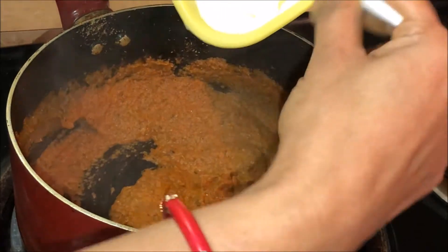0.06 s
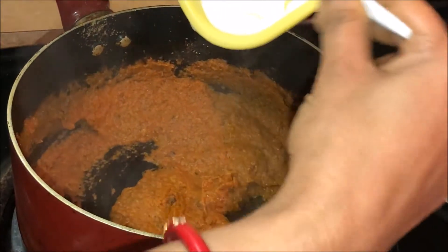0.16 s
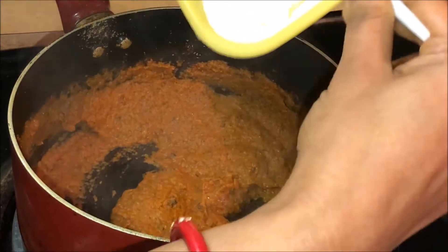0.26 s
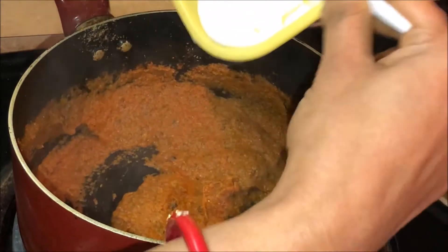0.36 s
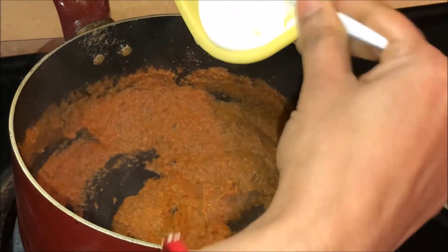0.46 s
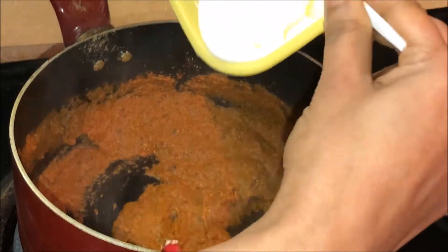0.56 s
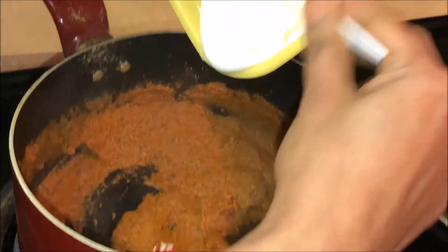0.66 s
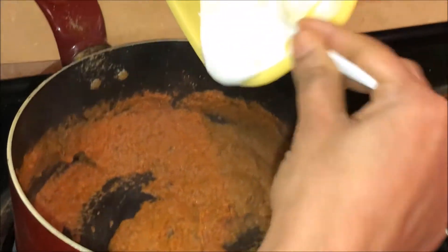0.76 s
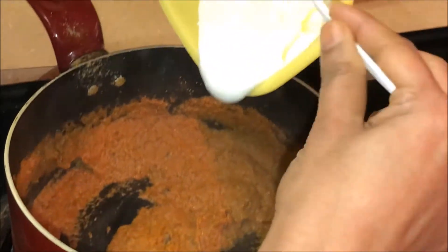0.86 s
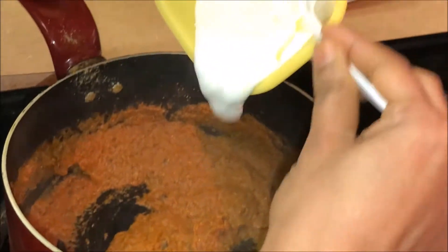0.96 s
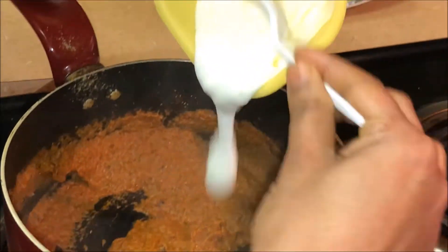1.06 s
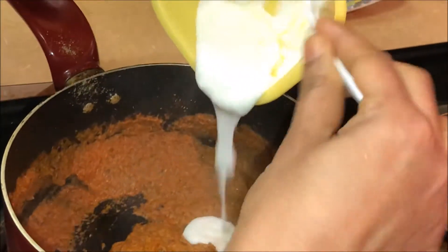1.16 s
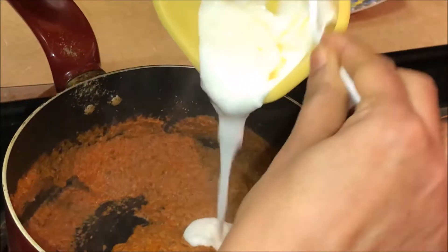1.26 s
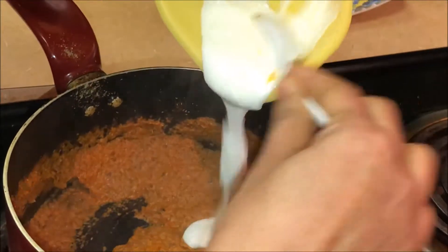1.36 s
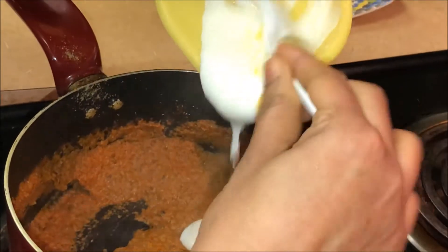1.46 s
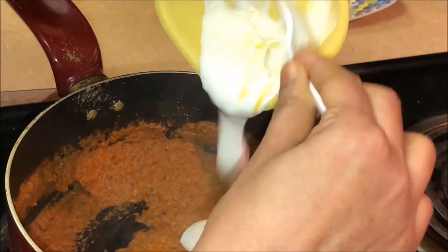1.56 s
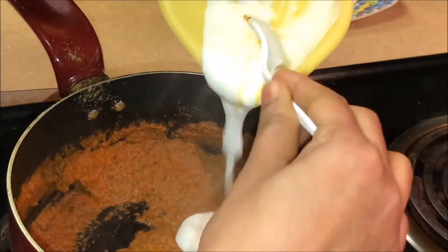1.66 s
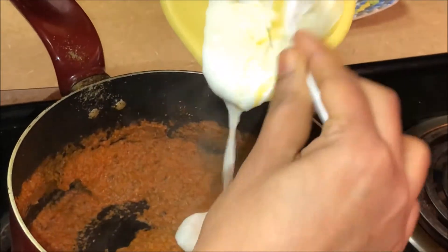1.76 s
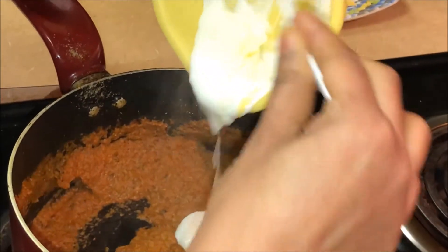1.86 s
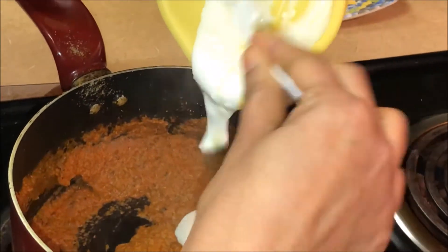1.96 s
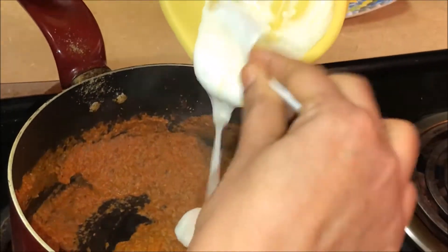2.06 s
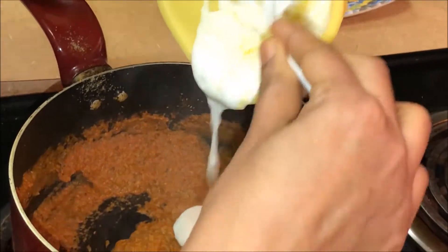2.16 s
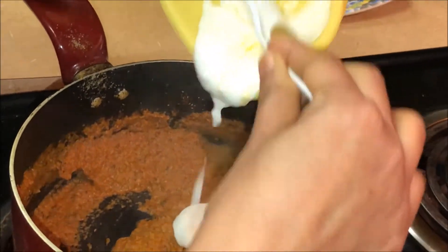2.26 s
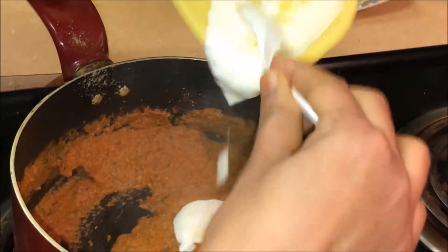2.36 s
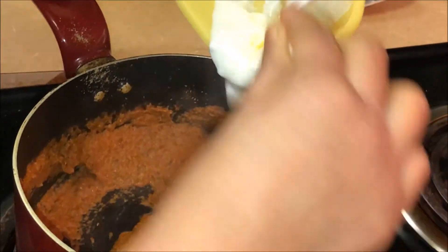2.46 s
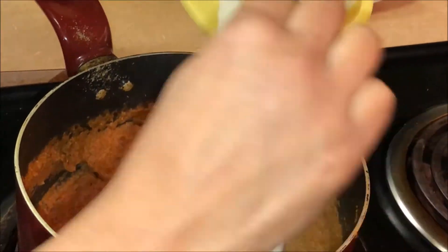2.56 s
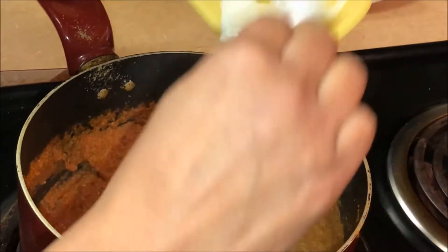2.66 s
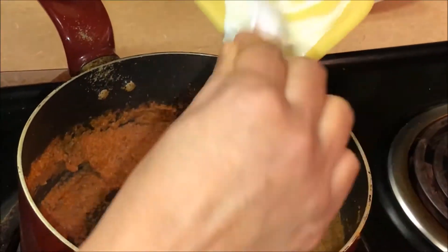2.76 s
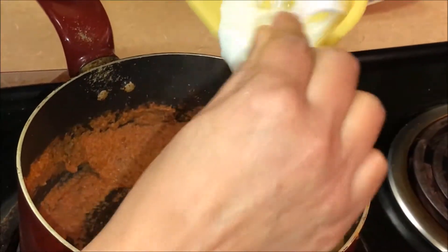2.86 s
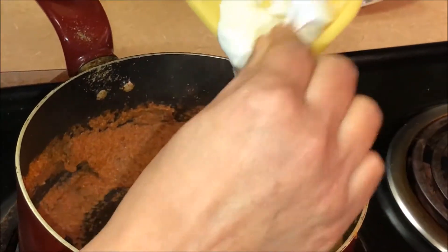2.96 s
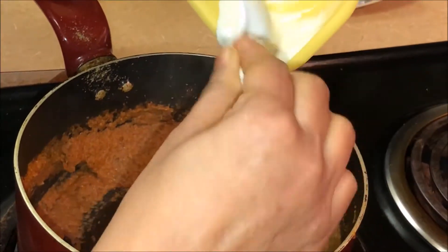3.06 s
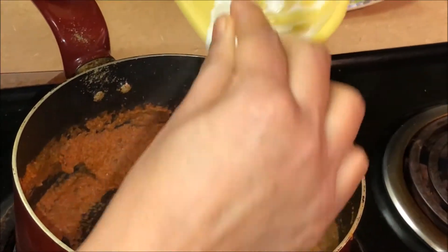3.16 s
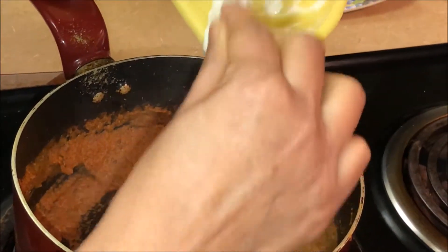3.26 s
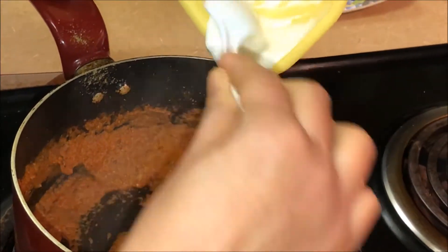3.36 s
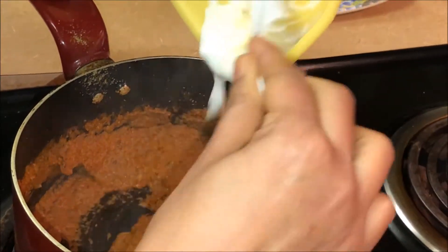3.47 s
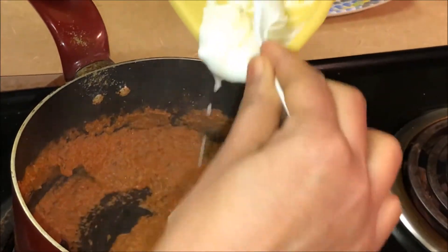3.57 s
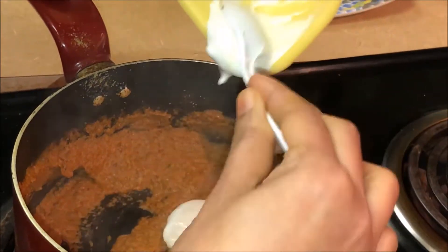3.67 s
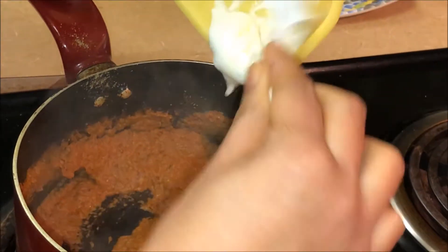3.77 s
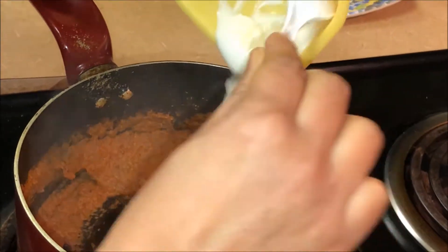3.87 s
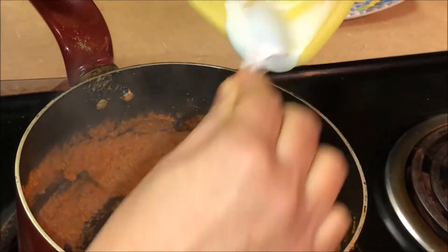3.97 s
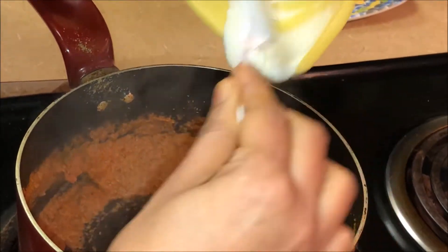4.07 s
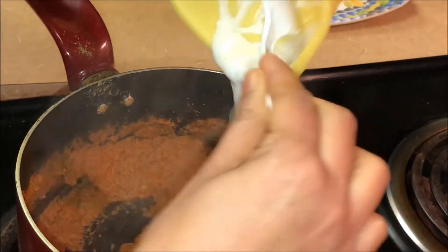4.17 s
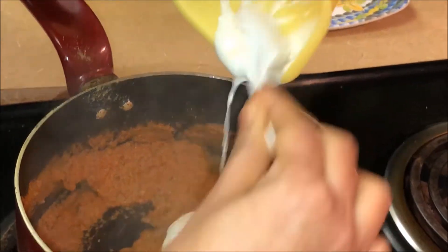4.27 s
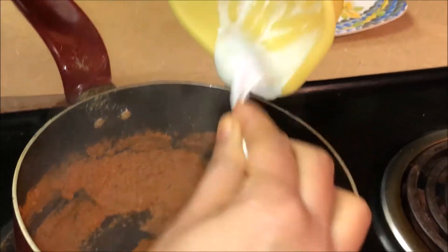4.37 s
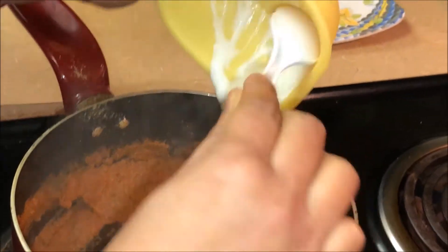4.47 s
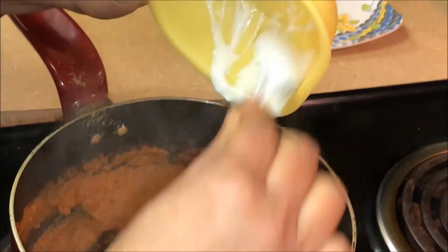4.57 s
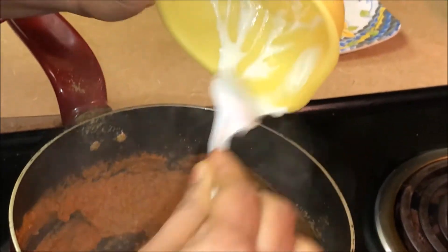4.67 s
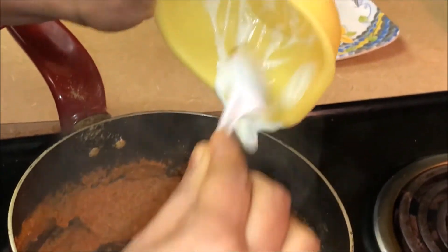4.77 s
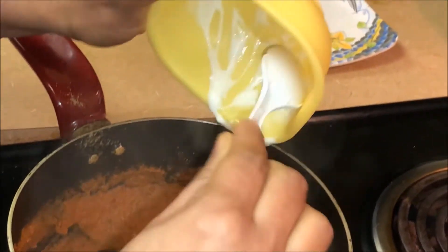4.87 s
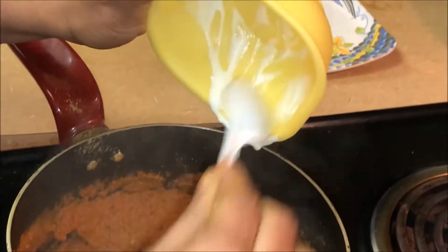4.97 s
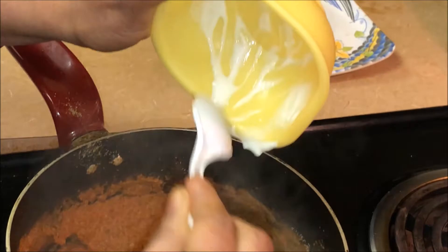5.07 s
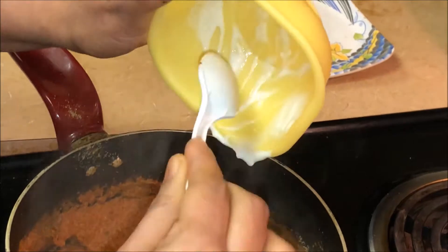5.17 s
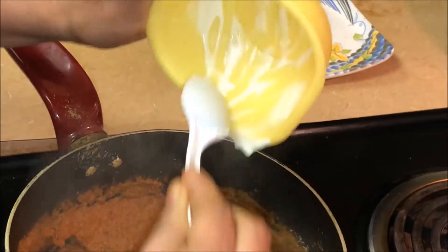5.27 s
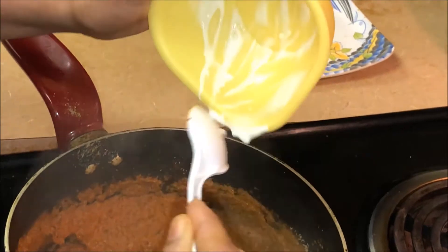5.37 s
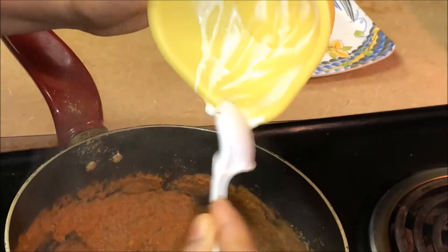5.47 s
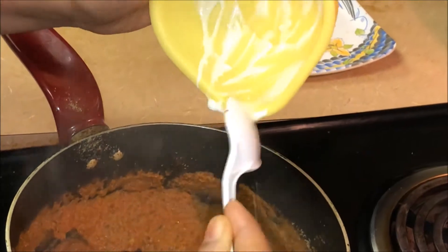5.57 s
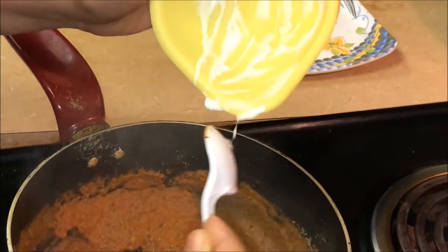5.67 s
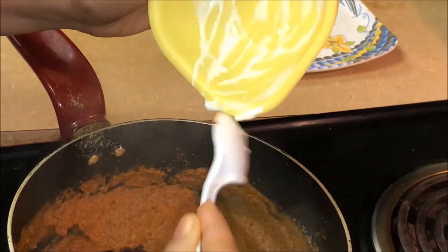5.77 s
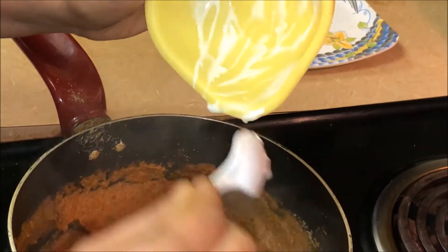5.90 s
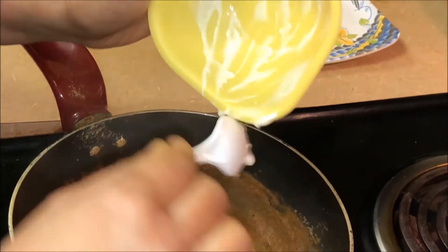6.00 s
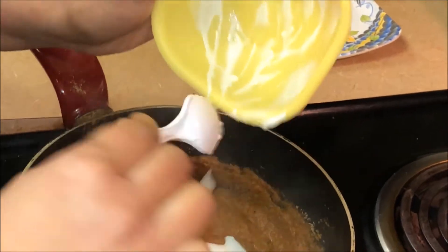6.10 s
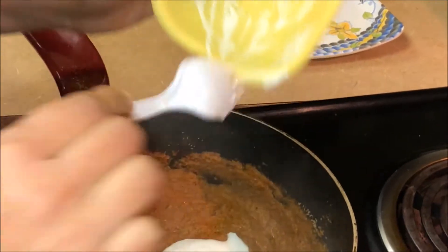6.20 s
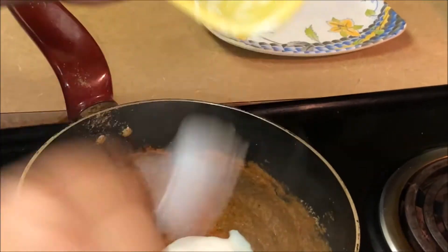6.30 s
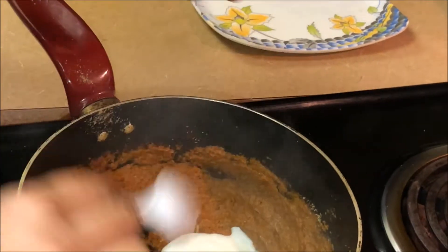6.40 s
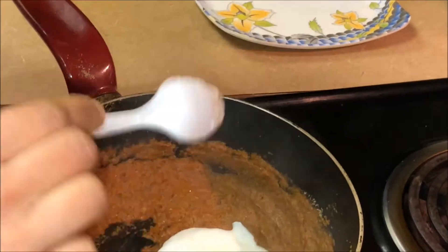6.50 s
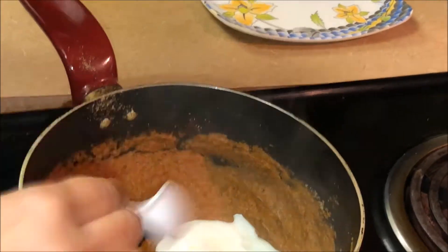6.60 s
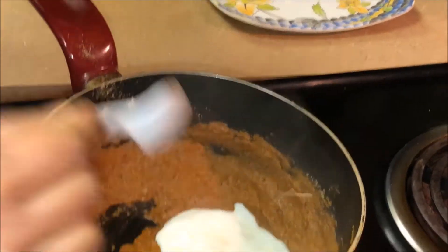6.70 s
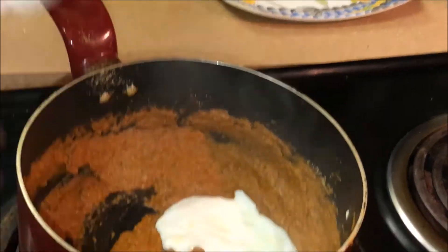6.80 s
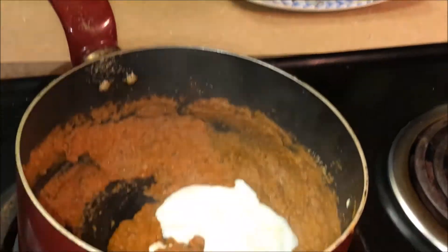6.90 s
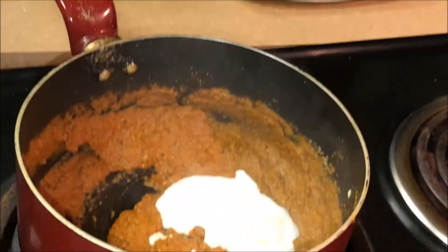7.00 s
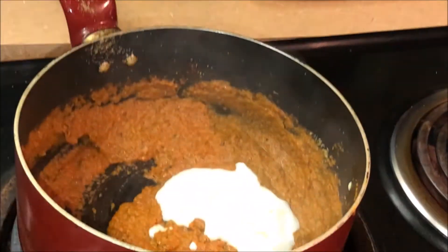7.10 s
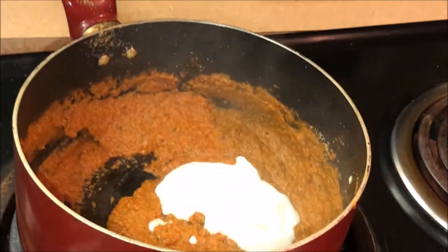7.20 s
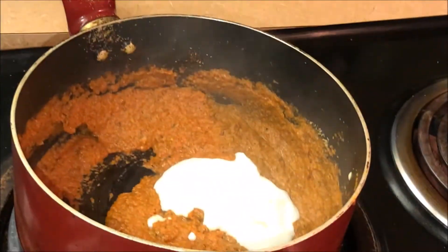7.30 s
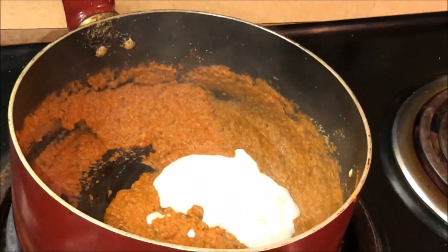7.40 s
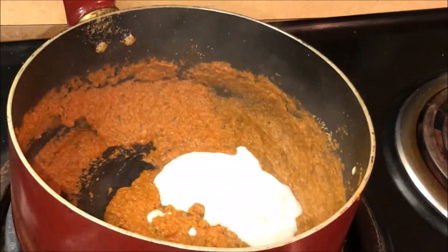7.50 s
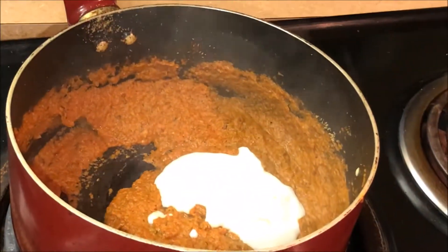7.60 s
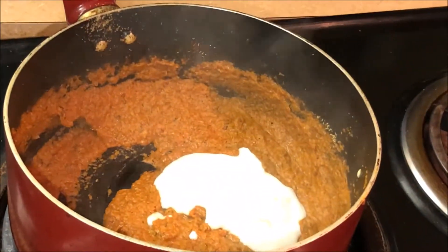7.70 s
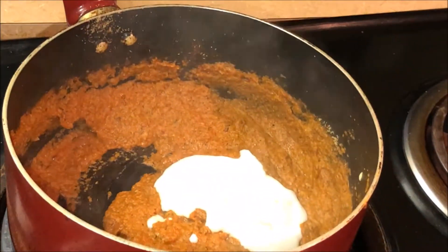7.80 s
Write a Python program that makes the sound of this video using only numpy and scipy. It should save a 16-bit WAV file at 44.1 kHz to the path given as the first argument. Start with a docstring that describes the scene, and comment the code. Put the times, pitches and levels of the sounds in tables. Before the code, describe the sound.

Close by, a plastic spoon knocks irregularly inside a plastic tub, with short, wet, rasping scrapes through thick yogurt. Early on, yogurt lands in a pan with one soft, low plop while spice paste bubbles gently. The wet plastic squeaks briefly, the knocking stops, and the tub is set down on the counter a little further off. A faint sizzle and a low mains hum run throughout, in a small, slightly echoing kitchen.

```python
"""A plastic spoon knocks and scrapes thick yogurt out of a plastic tub into a pan, close by.
Each knock makes the tub and spoon ring briefly. Each scrape rasps as the edge sticks and slips, and
hisses as wet films tear. Wet plastic squeaks, the rim rings, fingers rustle, and at the end the tub is
set down further off. In the pan, yogurt lands with one low plop, and spice paste bubbles with soft
bloops, sizzles faintly and whistles twice. A small kitchen echoes around it, over a low mains hum."""
import sys
import numpy as np
from scipy import signal
from scipy.fft import rfft, irfft, next_fast_len
from scipy.io import wavfile
from scipy.ndimage import uniform_filter1d

SR = 44100
rng = np.random.default_rng(int(sys.argv[2]) if len(sys.argv) > 2 else 0)


def inscribe(sig):
    """Save sig as 16-bit PCM at rate SR to the path in sys.argv[1].

    A 1-D sig is mono; a 2-D sig holds one channel per row.
    Samples are clipped to [-1, 1] before scaling.
    """
    pcm = np.round(np.clip(np.atleast_2d(sig).T, -1, 1) * 32767)
    wavfile.write(sys.argv[1], SR, pcm.astype(np.int16))


N = 345992
TIME = np.arange(N) / SR


# The spoon's knocks: start_s, wall_db, thud_db, rim_db, spoon_db, click_brightness_db_per_octave,
# wall_hz, rim_hz, spoon_hz, skid_s
KNOCKS = [(0.0933, -49, -73, -65, -59, 0, 1410, 3140, 4020, .0025),
          (0.295, -48, -57, -57, -47, 0, 1600, 3360, 4000, 0.0037),
          (0.341, -62, -67, -65, -50.5, 2, 1430, 3260, 4400, .0005),
          (0.364, -45, -59, -59, -53, 4, 1530, 2950, 3950, .0026),
          (0.389, -62, -60, -58, -48, -8, 1450, 3200, 5000, .0025),
          (0.4083, -52, -81, -54, -43.5, -20, 1450, 2900, 5100, .0006),
          (0.463, -64, -74, -47, -46, 4, 1450, 3320, 5170, .002),
          (0.6235, -47, -55, -48.5, -39, 3, 1390, 3040, 4450, 0.00018),
          (0.6667, -43, -54, -48, -50, 1, 1430, 2900, 3950, 0.001),
          (0.7228, -42, -56, -62, -50, -5, 1440, 2950, 3950, .0007),
          (0.7519, -44, -53.5, -49, -44, 18, 1430, 3140, 4000, 0.00074),
          (0.9078, -37.5, -55, -48, -37.5, 5, 1670, 3200, 3950, 0.0016),
          (0.9831, -30.5, -55, -30.5, -33.5, -10.5, 1520, 3200, 3770, 0.00035),
          (1.044, -27, -50, -35, -30, 7, 1590, 3300, 3980, 0.01),
          (1.052, -27, -54.5, -31.5, -31, 3, 1590, 3170, 4080, 0.0078),
          (1.2355, -42, -50.5, -40.5, -39.5, 10.5, 1430, 3120, 4030, .0007),
          (1.376, -46, -57, -59, -64, 0, 1340, 3100, 3950, 0.0026),
          (1.434, -38.5, -54.5, -37.5, -39.5, 9, 1390, 3100, 3950, 0.0018),
          (1.571, -44.5, -55.5, -42.5, -44, 4, 1600, 3080, 3860, 0.00087),
          (1.6599, -32, -49.5, -42, -34.5, 1.5, 1410, 3300, 4200, 0.0034),
          (1.8786, -40, -50.5, -41, -42, 9, 1420, 3120, 4020, .001),
          (1.92, -62, -59, -65, -44, 11, 1280, 3190, 3950, .0009),
          (1.951, -32.5, -47, -31, -32, -6.5, 1450, 2880, 4360, 0.00028),
          (2.001, -47, -61, -39, -37.5, -2, 1490, 3260, 5300, 0.0052),
          (2.01, -44, -70, -42.5, -49, 6.5, 1480, 3220, 3950, 0.0015),
          (2.244, -36.5, -51, -35, -33.5, 0.5, 1590, 3340, 3830, 0.00041),
          (2.3094, -57, -56, -51, -39, 7, 1680, 3480, 3950, 0.0046),
          (2.3189, -34, -45.5, -38.5, -32, 3.5, 1420, 2920, 4320, 0.001),
          (2.398, -39, -46.5, -41, -45, 8, 1340, 3130, 3900, 0.0023),
          (2.4057, -39.5, -65, -39.5, -37, -21, 1450, 3050, 4550, 0.0018),
          (2.563, -47.5, -53, -59, -69, 5, 1310, 2980, 4130, 0.0028),
          (2.656, -40.5, -58, -50.5, -46.5, 4, 1440, 3130, 4100, .0014),
          (2.727, -35.5, -52, -39.5, -47.5, 1.5, 1480, 2900, 4100, 0.0033),
          (2.808, -61, -63, -52, -63, 0, 1450, 3100, 4100, .0015),
          (2.9461, -37, -47, -46, -38.5, 5, 1340, 2700, 4000, 0.00071),
          (2.977, -46.5, -59, -53, -64, -12, 1450, 3450, 4100, 0.0065),
          (3.0433, -47, -64, -64, -50, 1, 1570, 2850, 4100, .0029),
          (3.0905, -50.5, -56, -67, -46, 18, 1340, 3050, 4500, .0004),
          (3.126, -56, -70, -58, -65, 0, 1450, 3050, 4100, 0.0023),
          (3.2793, -42.5, -53.5, -53, -55.5, -3, 1350, 3000, 4100, 0.0014),
          (3.3377, -42.5, -60, -54, -62, 0, 1350, 2900, 4100, .0028),
          (3.352, -46, -66, -50.5, -56, 2, 1350, 2850, 4140, .001),
          (3.3578, -41, -57, -54, -49, 6, 1390, 2840, 4100, .0062),
          (3.5596, -39, -49.5, -34, -35, -8, 1400, 2970, 3960, 0.0014),
          (3.6272, -30, -47.5, -30.5, -25.5, -7, 1394, 3100, 4530, 0.00023),
          (3.7217, -43, -57, -46.5, -57, 5, 1410, 3550, 4170, 0.0037),
          (3.8578, -28.5, -47.5, -40.5, -35, 6, 1440, 3080, 4830, 0.0025),
          (3.9872, -33, -54.5, -39.5, -40, 8.5, 1530, 3100, 4150, .0035),
          (4.008, -52, -72, -54, -48, 6, 1450, 3050, 4500, .001),
          (4.081, -53, -74, -45, -54, 2.5, 1480, 3100, 4240, 0.0092),
          (4.2171, -40.5, -52.5, -39, -36.5, 5, 1340, 3000, 4060, 0.0016),
          (4.2436, -33, -52, -32.5, -33.5, 2, 1380, 2920, 4220, 0.00074),
          (4.386, -42.5, -71, -47, -55, -6, 1430, 3030, 4240, 0.0026),
          (4.531, -32.5, -54, -41, -37, 7, 1490, 2920, 4530, 0.0035),
          (4.639, -37.5, -71, -50, -46, 16, 1450, 3160, 4200, 0.015),
          (4.7354, -40, -69, -38.5, -43, -4, 1420, 3020, 4430, 0.0043),
          (4.7427, -34, -70, -33, -41, -5, 1436, 3020, 4530, 0.0031),
          (4.9213, -26.5, -49, -37.5, -31.5, 6.5, 1470, 2950, 4250, 0.0016),
          (5.0445, -49, -59, -50, -54, -5, 1480, 2840, 4200, 0.004),
          (5.0854, -35.5, -63, -44, -51, -6, 1460, 2840, 4200, 0.012),
          (5.094, -36.5, -75, -36, -41, -9, 1520, 3000, 4330, 0.0028),
          (5.2852, -25, -56, -24, -19, -6, 1420, 3140, 4360, 0.00043),
          (5.3814, -42.5, -61, -41.5, -44, -5, 1400, 2820, 4230, .0044),
          (5.548, -41, -66, -49.5, -49.5, 6, 1450, 3200, 4200, .002),
          (5.6618, -37, -59, -51, -56, 3, 1430, 3020, 4200, 0.009),
          (5.6694, -45, -55, -40.5, -42, 1, 1260, 3120, 4400, 0.0056),
          (5.8308, -48, -62, -56.5, -53.5, 4, 1450, 3020, 4300, 0.0035),
          (6.105, -43, -51, -49, -43.5, -1, 1300, 3170, 4200, 0.017),
          (6.127, -49, -72, -63, -51, 2, 1340, 3100, 4220, 0.0081),
          (6.1422, -45, -62, -56, -62, 4, 1380, 3120, 4200, 0.0039)]

def spoon_knocks():
    """The knocks as heard close by, and as sent into the room from all sides, with less ring."""
    direct, all_round = np.zeros((2, N))
    for start_s, wall_db, thud_db, rim_db, spoon_db, *tone, skid_s in KNOCKS:
        add(direct, *knock(start_s, wall_db, thud_db, rim_db, spoon_db, *tone, skid_s, contact_db=0.5))
        add(all_round, *knock(start_s, wall_db - 4, thud_db - 3, rim_db - 2.5, spoon_db - 1, *tone,
                              skid_s=0.00018, contact_db=2, skid=0.011, hollow=0.011, blur=1.4))
    return direct, all_round


# The notes each part rings at, damped by hands and yogurt (wider dies sooner): pitch_hz, width_hz, level_db
WALL_NOTES = [(1325, 320, 9), (1450, 350, 7.5), (1680, 1050, -4.5), (2150, 250, -15.5)]
THUD_NOTES = [(455, 860, -7), (927, 330, 2)]
RIM_NOTES = [(2775, 1500, -14.5), (3100, 580, 3.5), (3260, 370, -8)]
SPOON_NOTES = [(3790, 360, 11), (4344, 255, 13.5), (4880, 500, 6), (5680, 730, 8), (6570, 990, 3.5),
               (8400, 2250, -1.5), (10940, 5600, -10), (14300, 9700, -13)]
WALL_HZ, RIM_HZ, SPOON_HZ = 1430, 3122, 4350  # each part's usual pitch

def knock(start_s, wall_db, thud_db, rim_db, spoon_db, bright_db, wall_hz, rim_hz, spoon_hz, skid_s,
          contact_db, skid=0.3, hollow=0.14, blur=1, size=2304):
    """The edge slides, catches and skids on, ringing tub and spoon. Gives a start time and a sound."""
    hit = 256  # samples of sliding before the edge catches
    t = (np.arange(size) - hit) / SR

    def fade(fade_s):
        return np.exp(-abs(t) / max(fade_s, 1 / SR))

    before = np.hypot(skid * fade(0.23 * skid_s), 0.0048 * fade(0.0042))  # long skids start more softly
    after = np.hypot(skid * fade(skid_s), hollow * fade(0.0025))  # sound bounces about inside the tub
    force = np.where(t < 0, before, after) * rng.standard_normal(size)
    force[hit] = 1.06
    spoon_notes_hz = np.array(SPOON_NOTES)[:, 0]
    treble_db = bright_db * np.maximum(np.log2(spoon_notes_hz / spoon_notes_hz[1]), 0)
    parts = ((WALL_NOTES, wall_db, wall_hz / WALL_HZ, 0, 0.8),
             (THUD_NOTES, thud_db, 1, 0, 0.33),
             (RIM_NOTES, rim_db, rim_hz / RIM_HZ, 0, 0.8),
             (SPOON_NOTES, spoon_db, spoon_hz / SPOON_HZ, treble_db, 0.8))
    sound = np.zeros(size)
    for notes, level_db, tuning, tilt_db, low_cut in parts:
        boost_db = tilt_db + contact_db * rng.standard_normal(len(notes))  # each spot favours some notes
        body = ring(np.array(notes) * [1, blur, 1], tuning, boost_db, low_cut, steepness=12)
        sound += at_knock_level(signal.fftconvolve(force, body)[:size], level_db)
    return start_s + t[0], sound


# Drags through the yogurt: start_s, length_s, level_db, wetness_0_to_1, hiss_growth_db
STROKES = [(-.04, 0.16, -47.5, 0.6, 6), (0.116, 0.065, -47, 0.9, -13), (0.368, 0.067, -48.5, 0.66, -8),
           (0.438, 0.046, -42.5, 0.99, -7), (0.964, .025, -52, 0.5, 0), (0.727, 0.024, -39, 1, -3),
           (1.319, 0.14, -49, 0.67, 8), (1.595, 0.17, -51.5, 0.64, -5), (1.912, 0.042, -45, 0.93, 14),
           (1.987, 0.051, -49.5, .2, 0), (2.039, 0.072, -50.5, 0.65, 12), (2.274, 0.065, -46.5, 0.6, 6),
           (2.369, 0.052, -47.5, 0.77, 6), (2.607, 0.19, -50.5, 0.86, 26), (2.969, 0.099, -52, 0.55, 15),
           (3.068, 0.044, -47, 1, 9), (3.291, 0.14, -48.5, 0.75, 5), (3.476, .02, -67, 1, -3),
           (3.649, .12, -50.5, 0.62, 0), (3.941, 0.11, -48, 0.75, -11), (4.294, 0.11, -45.5, 0.76, -9),
           (4.546, 0.063, -51.5, 0.4, -4), (4.597, 0.15, -46, 0.73, -2), (4.963, 0.15, -53.5, 1, 14),
           (5.369, 0.038, -50, 0.7, -3), (5.639, 0.051, -47, 0, 11), (6.03, 0.039, -55, 0.63, 9),
           (6.103, 0.026, -46.5, 1, -10)]
# The tone of tearing yogurt: pitch_hz, level_db
YOGURT_TONE = [(300, -25.5), (1000, -15), (2300, 2), (3200, 0), (5500, 1.5), (7500, -4), (11000, -10),
               (16000, -19)]

def scrapes(film_s=0.0094, wet_db_per_octave=21, usual_wetness=0.63, contact_db=3, size=12288):
    """The edge sticks and slips on the wall while films of yogurt tear behind it in puffs and snaps."""
    out = np.zeros(N)
    for start_s, length_s, level_db, wetness, growth_db in STROKES:
        slips = clicks(per_s=900, spread_db=4, size=size)
        tuning = 1 + 0.1 * rng.standard_normal()
        wall = ring(WALL_NOTES, tuning, contact_db * rng.standard_normal(len(WALL_NOTES)))
        rim = ring(RIM_NOTES, tuning, contact_db * rng.standard_normal(len(RIM_NOTES)))
        rasp = signal.fftconvolve(slips, unit(wall) + amp(-4) * unit(rim))

        tears = clicks(per_s=1000, spread_db=5, size=size)
        puffs = signal.lfilter([1], [1, -np.exp(-1 / (film_s * SR))], tears ** 2)
        tilt_db = wet_db_per_octave * (wetness - usual_wetness)  # wetter films are finer and brighter
        tone = [(hz, db + tilt_db * np.log2(hz) + contact_db * rng.uniform(-1.8, 1))
                for hz, db in YOGURT_TONE]
        clumps = amp(2 * wander(size, smooth=220))
        tearing = unit(np.sqrt(puffs) * rng.standard_normal(size))
        snaps = amp(-1) * clicks(per_s=480, spread_db=1, size=size)
        hiss = yogurt_pockets(colour(clumps * (tearing + snaps), tone))

        n = round(length_s * SR)
        heaping = amp(growth_db * np.linspace(-.5, .5, n))  # the hiss follows the heap of yogurt
        drag = np.sqrt(1 - wetness) * unit(rasp[:n]) + np.sqrt(wetness) * unit(heaping * hiss[:n])
        add(out, start_s, amp(level_db) * signal.windows.tukey(n, 0.38) * drag)
    return out


def yogurt_pockets(hiss, depth_db=5):
    """Pockets open and close in the yogurt, each colouring the hiss for a moment."""
    bands = signal.stft(hiss, nperseg=512)[2]
    patches = uniform_filter1d(rng.standard_normal(bands.shape), size=4, axis=0)  # smooth over pitch
    patches = unit(uniform_filter1d(patches, size=3, axis=1))  # and over time
    return unit(signal.istft(bands * amp(depth_db * patches), nperseg=512)[1][:len(hiss)])


def catches(per_stroke=3, below_stroke_db=12):
    """Here and there in each stroke the edge catches lightly on the wall."""
    out = np.zeros(N)
    for start_s, length_s, level_db, *_ in STROKES:
        for when, place, force in rng.random((per_stroke, 3)):
            db = level_db - below_stroke_db + 3 * (2 * force - 1)
            tuning = 1 + 0.041 * (2 * place - 1)
            add(out, *knock(start_s + when * length_s, wall_db=db, thud_db=db - 20, rim_db=db - 3,
                            spoon_db=db + 4.5, bright_db=6, wall_hz=WALL_HZ * tuning,
                            rim_hz=RIM_HZ * tuning, spoon_hz=SPOON_HZ * tuning,
                            skid_s=0.0053, contact_db=4))
    return out


# Squeaks and, near 3100 Hz, the rim ringing: start_s, length_s, level_db, start_hz, end_hz
TUB_TONES = [(4.924, 0.016, -33.5, 1800, 1770), (4.96, 0.033, -47, 1800, 2000),
             (5.089, 0.0082, -33.5, 3200, 2540), (5.658, 0.017, -46, 870, 1160),
             (6.094, 0.029, -50, 1400, 1460), (6.096, 0.028, -47.5, 3230, 3110),
             (6.13, 0.026, -51, 3000, 3130), (6.103, 0.032, -46, 5350, 9600)]

def tub_tones(wobble=0.017, octave_db=-15):
    """Brief gliding tones from the tub: wet plastic squeaks and the rim rings."""
    out, waver = np.zeros(N), wander(N, smooth=60)
    for start_s, length_s, level_db, start_hz, end_hz in TUB_TONES:
        n = round(length_s * SR)
        pitch_hz = np.linspace(start_hz, end_hz, n) * (1 + wobble * waver[round(start_s * SR):][:n])
        phase = 2 * np.pi * np.cumsum(pitch_hz) / SR
        tone = unit(np.sin(phase) + amp(octave_db) * np.sin(2 * phase))
        add(out, start_s, amp(level_db) * np.hanning(n) * tone)
    return out


# The hand changes its hold: start_s, length_s, level_db
GRIPS = [(-.05, 0.39, -62.5), (.838, 0.033, -52.5), (1.0, 0.049, -66), (1.97, 0.15, -69), (3.82, 0.51, -68),
         (6.03, 0.12, -66)]
# The tone of fingers on plastic: pitch_hz, level_db
RUSTLE_TONE = [(60, -31), (160, -14), (320, -3), (600, -10), (1000, -9), (3000, -34)]

def grip():
    """Fingers shift on the tub with a dull rustle that swells and fades."""
    swells = np.zeros(N)
    for start_s, length_s, level_db in GRIPS:
        add(swells, start_s, amp(level_db) * signal.windows.tukey(round(length_s * SR), .8))
    return swells * colour(clicks(per_s=270, spread_db=0.3), RUSTLE_TONE)


# The tub lands and is later nudged: start_s, base_db, slap_db, slap_brightness_db_per_octave, contact_s
LANDINGS = [(7.0930, -50, -43, -3.5, 0.00094), (7.1209, -52, -38, 0, .0037), (7.137, -60, -53, -6, 0.0034),
            (7.241, -78, -56, -5, .0073), (7.813, -67, -55, -7, .015)]
# The notes its base rings at: pitch_hz, width_hz, level_db
BASE_NOTES = [(1160, 390, 3), (1340, 320, -1), (1900, 760, -11), (5300, 660, -11)]
# The tone of its slap: pitch_hz, level_db
SLAP_TONE = [(300, -31), (900, -2), (1500, 5.5), (3000, 1), (5500, 7), (7500, -1), (11000, -4), (16000, -6)]

def tub_set_down(size=2048):
    """One side of the base touches the counter, then the rest slaps down and settles."""
    out, t = np.zeros(N), TIME[:size]
    attack = np.minimum(t * SR / 20, 1)
    for start_s, base_db, slap_db, bright_db, contact_s in LANDINGS:
        force = rng.standard_normal(size) * np.exp(-t / contact_s) * attack
        base = signal.fftconvolve(force, ring(BASE_NOTES))[:size]
        slap = colour(force, [(hz, db + bright_db * np.log2(hz)) for hz, db in SLAP_TONE])
        add(out, start_s, at_knock_level(base, base_db) + at_knock_level(slap, slap_db))
    return out


# Soft bloops in the pan (the lowest is the yogurt landing): start_s, length_s, pitch_hz, level_db
BLOOPS = [(0.928, .046, 577, -55.5), (1.019, .05, 379, -56), (1.148, 0.047, 547, -55),
          (1.312, 0.061, 546, -53.5), (1.448, 0.055, 526, -55.5), (1.581, 0.042, 555, -53.5),
          (1.703, 0.044, 555, -54.5), (1.845, 0.07, 530, -58.5), (2.022, 0.039, 546, -51.5),
          (2.285, 0.063, 548, -54.5), (2.589, 0.061, 555, -55)]

def bloops(width_hz=240, overtone_db=-20, size=4096):
    """Thick paste bubbles and yogurt lands with one low plop, each a short, hollow splutter."""
    out = np.zeros(N)
    for start_s, length_s, pitch_hz, level_db in BLOOPS:
        n = round(length_s * SR)
        notes = [(pitch_hz, width_hz, 0), (2 * pitch_hz, 2 * width_hz, overtone_db)]
        hollow = ring(notes, low_cut=0.75, steepness=8, size=size)
        splutter = clicks(per_s=500, spread_db=3.1, size=2 * size)
        bloop = signal.fftconvolve(splutter, hollow)[size:][:n]
        swell = np.sin(np.pi * np.linspace(0, 1, n) ** 0.69)  # peaks early
        add(out, start_s, amp(level_db) * unit(bloop * swell) / np.sqrt(2))
    return out


# The tone of frying paste: pitch_hz, level_db
SIZZLE_TONE = [(200, -53), (700, 2), (1100, 0), (1380, 6.5), (1530, 10), (1700, 6), (2200, 4), (3500, 7),
               (5200, 5), (7000, 1.5), (10000, -0.5), (16000, -1)]

def sizzle(level_db=-60, pop_gain=0.54):
    """Faint frying: a hiss and tiny bubbles of many sizes, louder once the arm has left the pan."""
    pops = np.zeros(N)
    for pitch_hz in np.geomspace(800, 12000, 24):
        bubble = ring([(pitch_hz, 120 + pitch_hz / 25, 0)])
        pops += unit(signal.oaconvolve(clicks(per_s=60, spread_db=4), bubble)[:N])
    frying = colour(rng.standard_normal(N) + pop_gain * unit(pops), SIZZLE_TONE)
    uncovered_db = np.interp(TIME, [5.5, 7.5], [0, 3])
    return frying * amp(level_db + uncovered_db)


# Thin whistles from the paste: start_s, length_s, pitch_hz, level_db
WHISTLES = [(6.445, 0.028, 4800, -60), (6.69, 0.036, 4830, -58)]

def whistles():
    """Steam escapes through a pinhole for a moment."""
    out = np.zeros(N)
    for start_s, length_s, pitch_hz, level_db in WHISTLES:
        t = TIME[:round(length_s * SR)]
        add(out, start_s, amp(level_db) * np.hanning(len(t)) * unit(np.sin(2 * np.pi * pitch_hz * t)))
    return out


# How long the kitchen's echo takes to fall by 60 dB: pitch_hz, fade_s
ECHO_FADE = [(300, 0.89), (1500, 0.62), (4000, 0.44), (8000, 0.28), (15000, 0.52)]

def kitchen_echo(sound, early_db=-21, tail_db=-10.5, echoes=10):
    """Pan, hob and wall throw back a few early echoes, then the room dies away band by band."""
    out, t = np.zeros(N), TIME[:SR * 3 // 4]
    pattern_now = (TIME / .21).astype(int) % 3  # the hands move, so three echo patterns take turns
    attack = np.clip(t / 0.0013, 0, 1) ** 2
    for pattern in range(3):
        bounces = rng.standard_normal(len(t)) * (rng.random(len(t)) < .15) * attack
        hz, age_s, bands = signal.stft(bounces, SR, nperseg=256)
        treble_db = look_up([(5000, 0), (12000, -4)], hz)[:, None]
        bands *= amp(treble_db - 60 * age_s / look_up(ECHO_FADE, hz)[:, None])
        tail = signal.istft(bands, SR, nperseg=256)[1][:len(t)]
        response = amp(tail_db) * tail / np.linalg.norm(tail)
        delays = (rng.uniform(0.0034, 0.012, echoes) * SR).astype(int)
        response[delays] += amp(early_db) * rng.choice([-1, 1], echoes) / np.sqrt(echoes)
        turn = uniform_filter1d(1.0 * (pattern_now == pattern), size=200)
        out += signal.oaconvolve(sound * turn, response)[:N]
    return out


def wall_echo(knocks, delay_s=0.0066, echo_db=-18):
    """The nearest kitchen wall returns each knock once, clearly."""
    out = np.zeros(N)
    add(out, delay_s, amp(echo_db) * knocks)
    return out


# The notes of the mains hum, and the tone of the room's rumble: pitch_hz, level_db
HUM_NOTES = [(54, -75.5), (120, -71)]
RUMBLE_TONE = [(20, -31), (35, -9), (55, -21), (80, 2), (130, 0.5), (200, -5), (400, -6), (800, -5),
               (1500, -24.5), (5000, -22)]

def background(rumble_db=-64):
    """Steady mains hum and low room noise."""
    hum = sum(amp(db) * np.sqrt(2) * np.sin(2 * np.pi * hz * TIME) for hz, db in HUM_NOTES)
    return hum + amp(rumble_db) * colour(rng.standard_normal(N), RUMBLE_TONE)


def ring(notes, tuning=1, boost_db=0, low_cut=0.55, steepness=2, size=2048):
    """How an object with these damped notes rings after one sharp tap."""
    pitch_hz, width_hz, level_db = np.transpose(notes)
    hz = np.fft.rfftfreq(size, 1 / SR)
    distance = 2 * (hz[:, None] - pitch_hz * tuning) / width_hz
    gain = (amp(level_db + boost_db) / (1 + distance ** 2 / 1.53) ** 1.53).sum(1)
    # a small object gives off little sound below its lowest note
    gain *= 1 - 1 / (1 + (hz / (low_cut * pitch_hz[0] * tuning)) ** steepness)
    # put all the ringing after the tap (minimum phase)
    cepstrum = irfft(np.log(gain + 1e-4))
    cepstrum[1:size // 2] *= 2
    cepstrum[size // 2 + 1:] = 0
    return irfft(np.exp(rfft(cepstrum)))


def clicks(per_s, spread_db, size=N):
    """A random train of tiny clicks, a few of them large."""
    height, sign, chance = rng.random((size, 3)).T
    level_db = spread_db * np.minimum(-np.log(1 - height), 3)
    return unit(amp(level_db) * np.sign(sign - .5) * (chance < per_s / SR))


def wander(size, smooth):
    """A random wobble: noise averaged over `smooth` samples."""
    return unit(uniform_filter1d(rng.standard_normal(size), size=smooth))


def colour(sound, tone):
    """Shapes a sound's bass and treble with a tone table, at average level 1."""
    size = next_fast_len(len(sound))
    gain = amp(look_up(tone, np.fft.rfftfreq(size, 1 / SR)))
    return unit(irfft(rfft(sound, size) * gain, size)[:len(sound)])


def look_up(table, hz):
    """Reads between a table's rows, with octaves evenly spaced."""
    pitch_hz, value = np.transpose(table)
    return np.interp(np.log(hz + 1), np.log(pitch_hz), value)


def at_knock_level(sound, level_db, knock_s=.01):
    """Gives a short sound the energy of level_db held for knock_s."""
    return amp(level_db) * np.sqrt(knock_s * SR / len(sound)) * unit(sound)


def amp(db):
    """Turns decibels into a gain."""
    return 10 ** (np.asarray(db) / 20)


def unit(sound):
    """Scales to an average level (rms) of 1."""
    return sound / np.sqrt(np.mean(sound ** 2) + 1e-20)


def add(mix, start_s, sound):
    """Mixes a sound in at start_s, cutting off what does not fit."""
    start = round(start_s * SR)
    sound = sound[max(-start, 0):]
    part = mix[max(start, 0):][:len(sound)]
    part += sound[:len(part)]


def scene():
    """The spoon works close by; the counter is further off, so more of its sound comes as echo."""
    knocks, knocks_all_round = spoon_knocks()
    near = scrapes() + catches() + tub_tones() + grip() + bloops() + whistles()
    far = tub_set_down()
    room = kitchen_echo(amp(0.2) * knocks_all_round + near + amp(9) * far) + wall_echo(knocks_all_round)
    return (knocks + near + far + room + sizzle() + background())[None]


def record(dry, cut_hz=16050):
    """Takes off the very highest treble."""
    low_pass = signal.firwin(401, cut_hz, window=("kaiser", 8), fs=SR)
    return signal.oaconvolve(dry, low_pass[None], "same")


dry = scene()
out = record(dry)
inscribe(out)
```